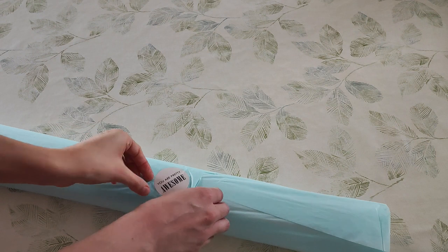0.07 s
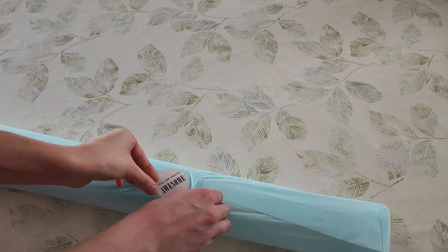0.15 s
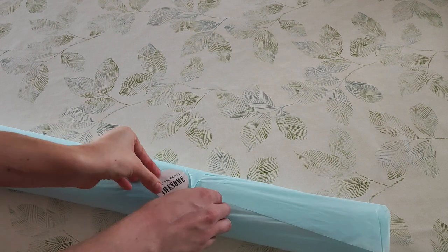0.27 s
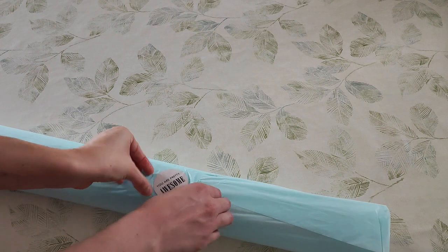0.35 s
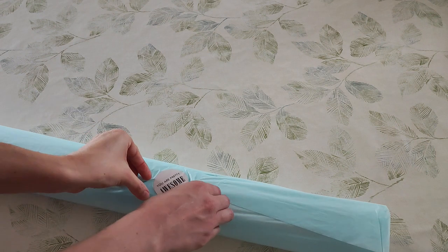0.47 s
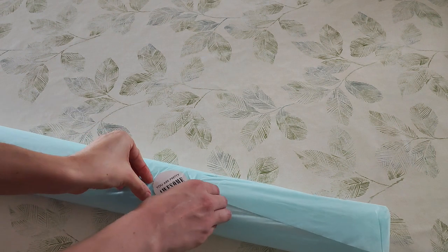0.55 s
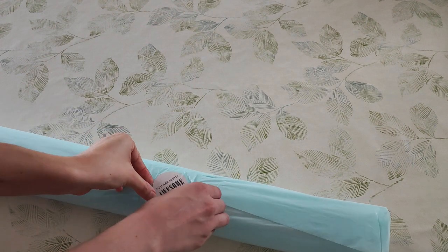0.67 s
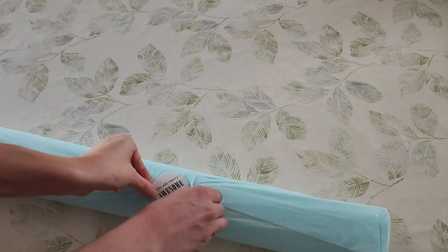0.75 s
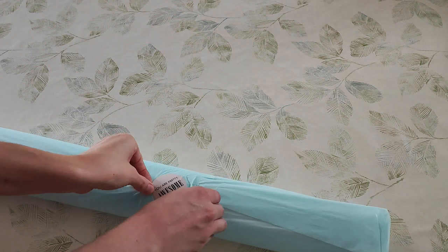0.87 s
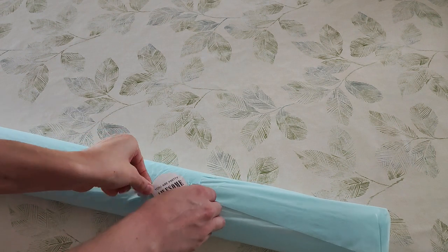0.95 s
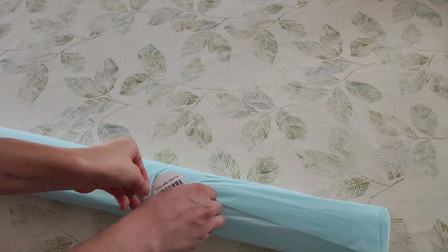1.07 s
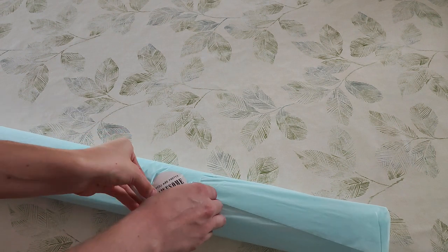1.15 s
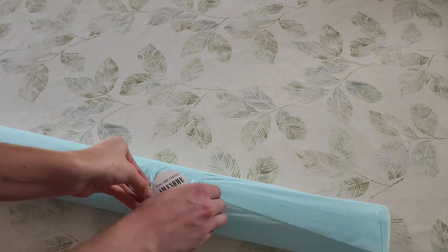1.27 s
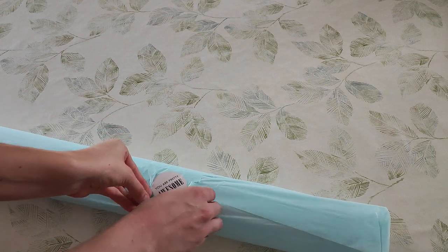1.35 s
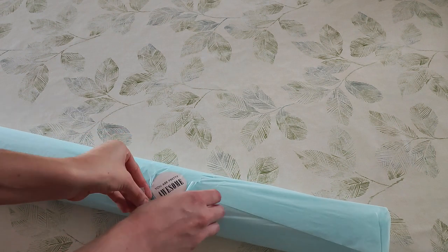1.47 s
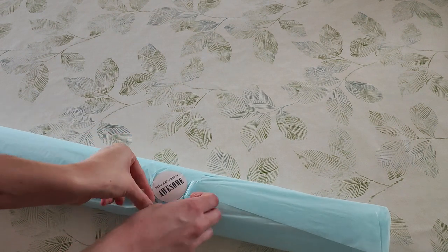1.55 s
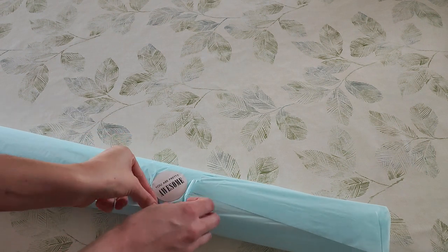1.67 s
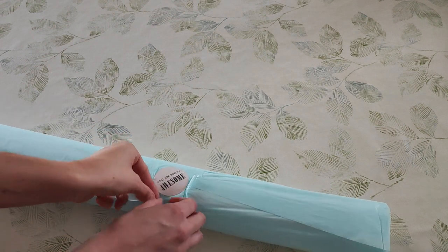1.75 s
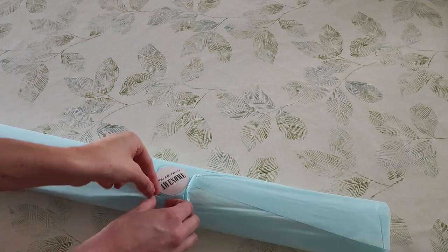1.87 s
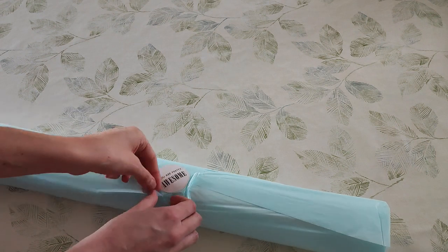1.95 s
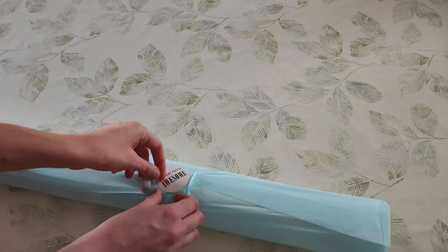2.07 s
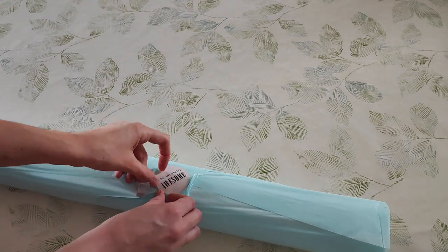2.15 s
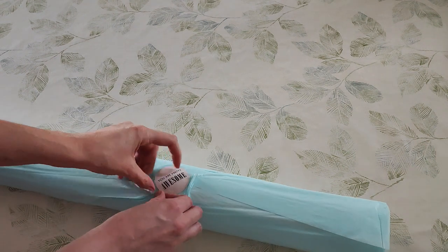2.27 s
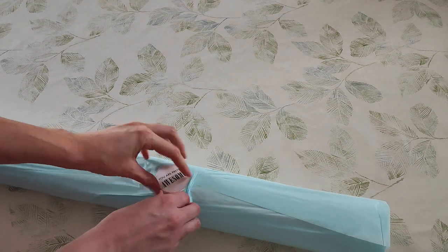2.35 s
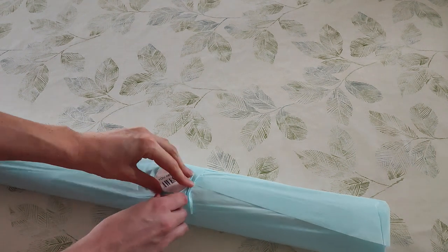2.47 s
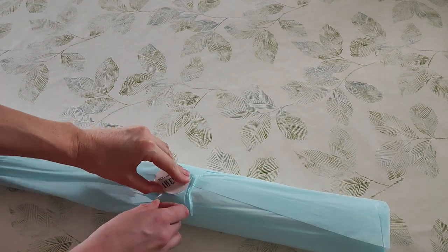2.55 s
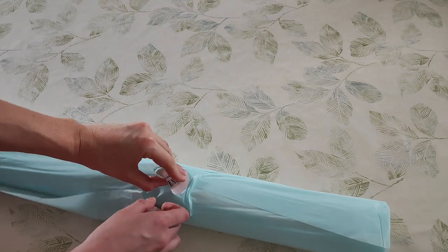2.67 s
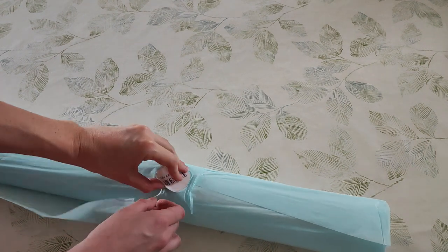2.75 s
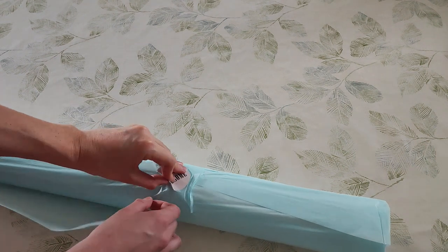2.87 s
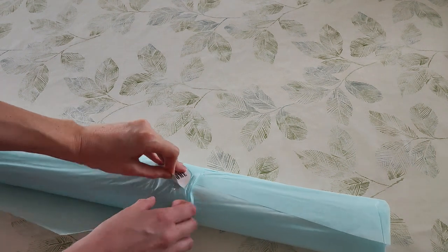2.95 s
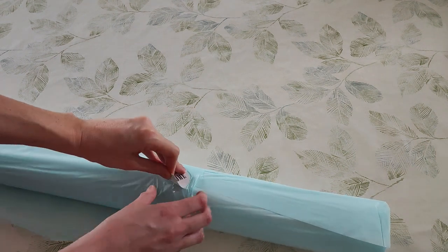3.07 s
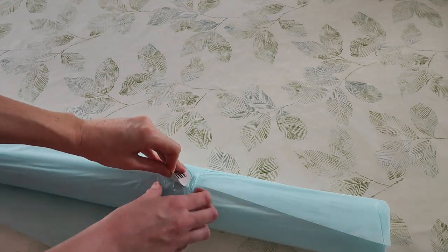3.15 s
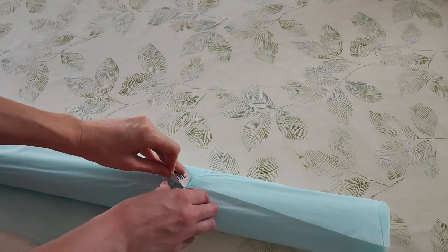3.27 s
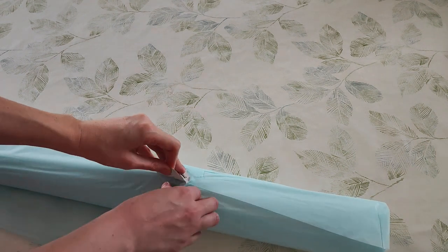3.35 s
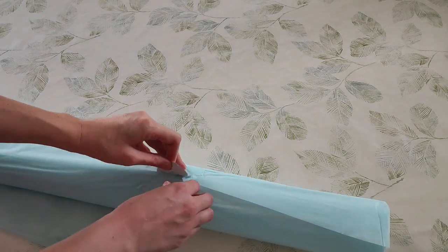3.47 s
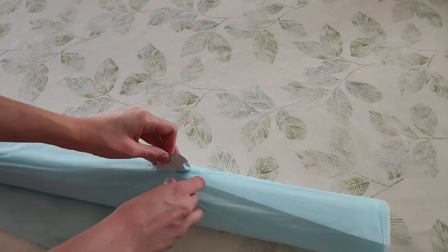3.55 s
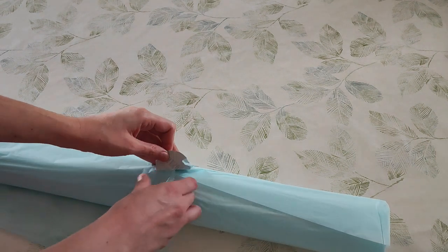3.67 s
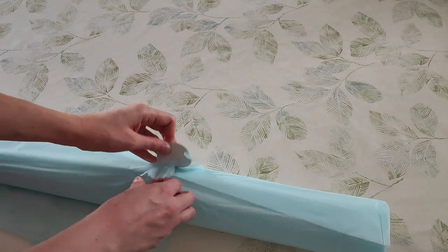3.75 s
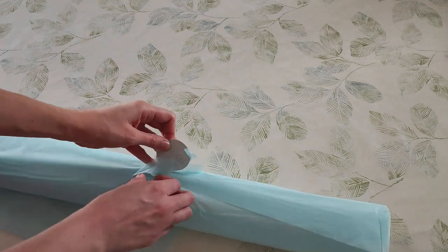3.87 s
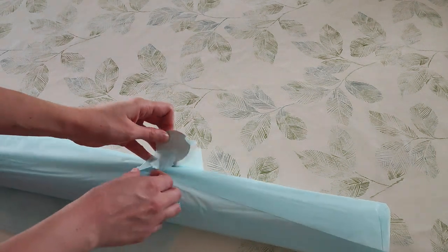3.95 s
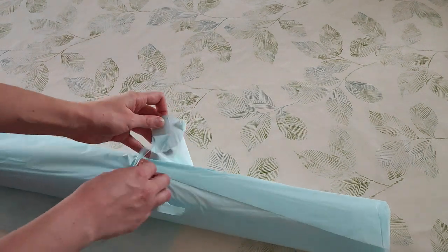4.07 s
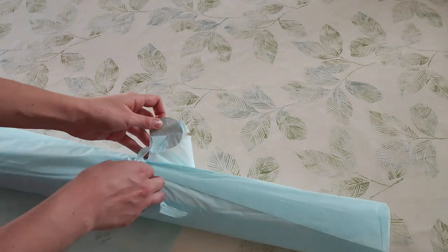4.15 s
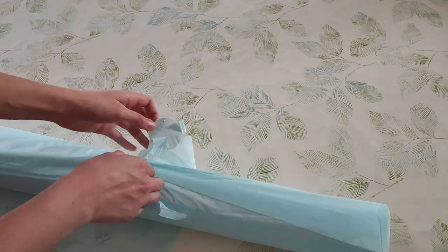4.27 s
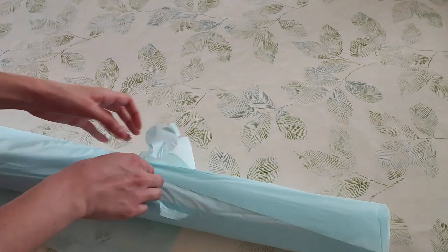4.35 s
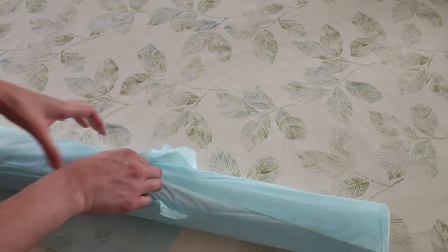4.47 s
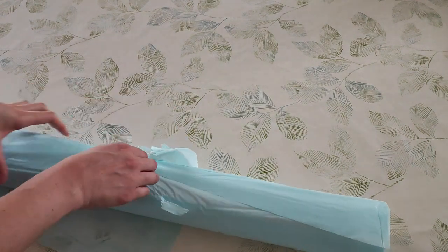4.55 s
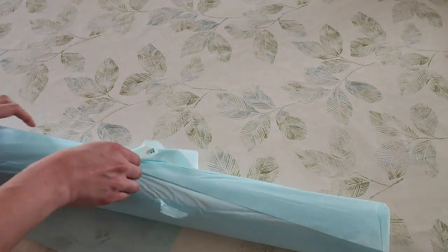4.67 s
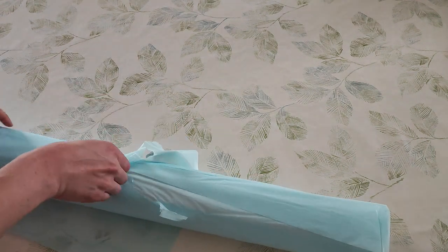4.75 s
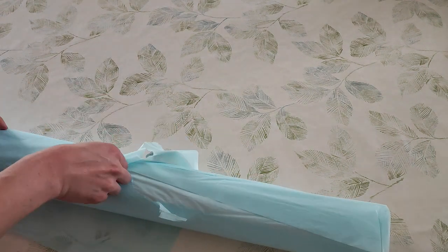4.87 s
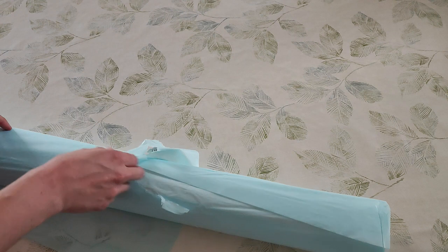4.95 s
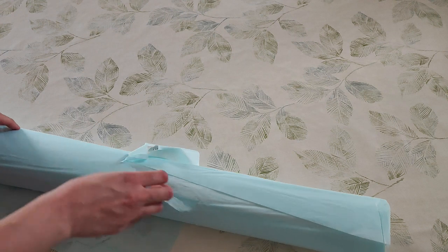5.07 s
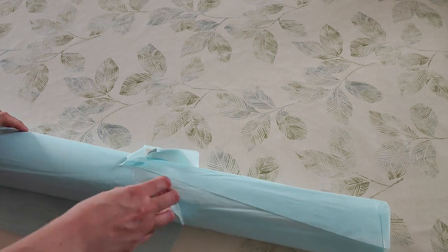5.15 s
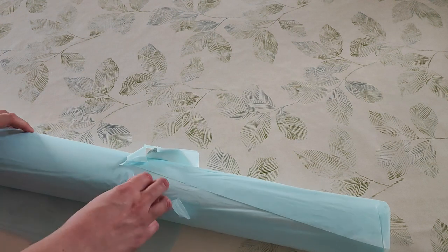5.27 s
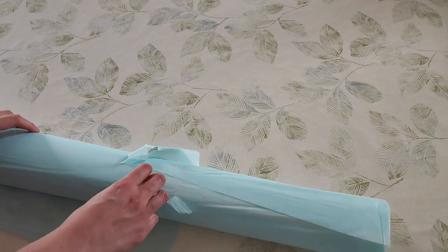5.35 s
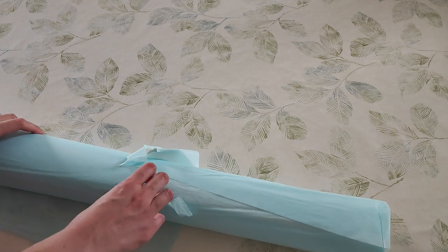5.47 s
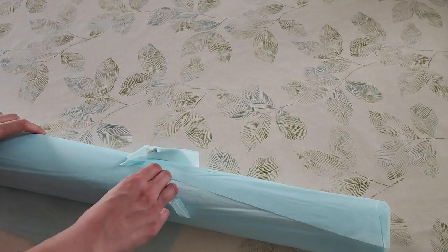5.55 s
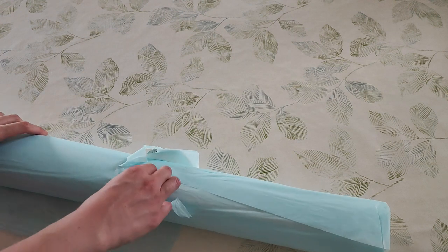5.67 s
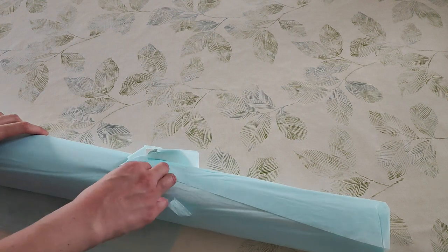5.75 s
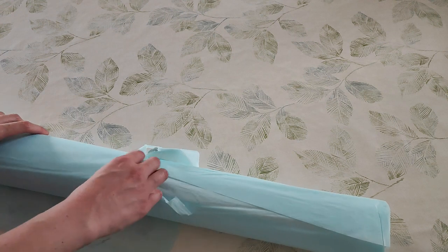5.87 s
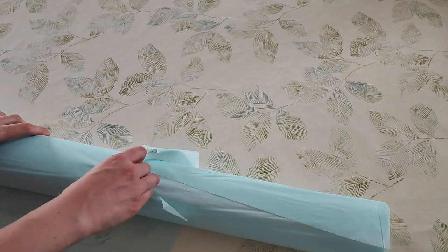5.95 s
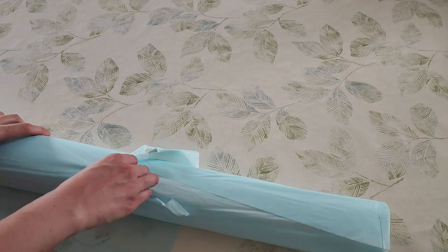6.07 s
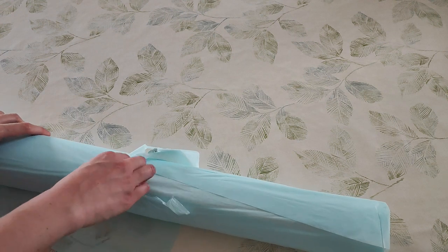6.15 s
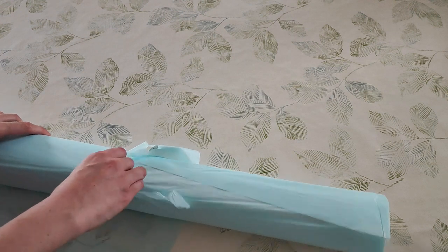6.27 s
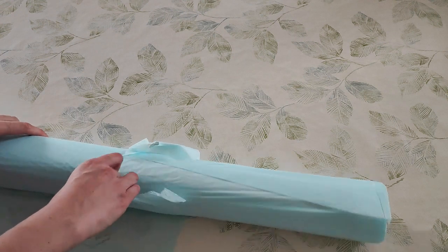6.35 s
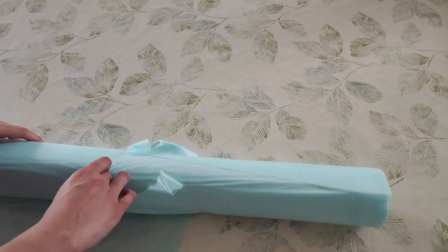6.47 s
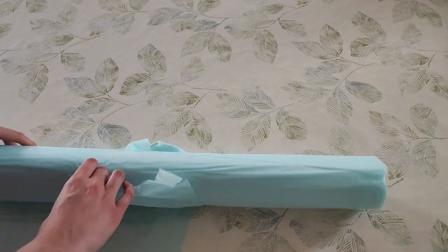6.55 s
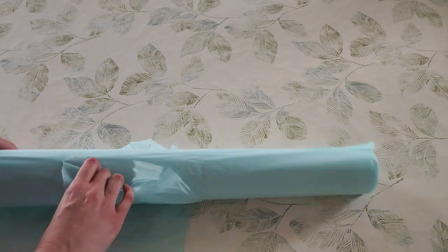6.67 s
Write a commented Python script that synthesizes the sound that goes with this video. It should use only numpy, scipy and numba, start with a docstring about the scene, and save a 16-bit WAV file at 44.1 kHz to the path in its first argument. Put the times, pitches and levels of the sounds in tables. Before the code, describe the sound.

Thin tissue paper is picked at with faint rustles and taps, then crinkles sharply in bursts before calming and being rolled, in a furnished room.

```python
"""Two hands pick a sticker off a roll of thin tissue paper on a table and unwrap it, heard in stereo.
The crinkle is thousands of short random pops, each ringing for a few cycles like a small buckle of the sheet.
Single creases snap and set off a flurry of more pops; knuckles and roll bump the table top and make it ring.
A furnished room answers with a fading noise tail, over a faint hum and hiss of shaped noise."""
import sys
import numpy as np
from scipy import signal
from scipy.fft import rfft, irfft
from scipy.io import wavfile
from scipy.ndimage import uniform_filter1d
from numba import njit

SR = 44100
rng = np.random.default_rng(int(sys.argv[2]) if len(sys.argv) > 2 else 0)


def master(y):
    """Save y as 16-bit WAV."""
    cut = np.clip(np.atleast_2d(y).T, -1, 1)
    pcm = np.round(cut * 32767)  # scale
    wavfile.write(sys.argv[1], SR, pcm.astype(np.int16))


N = 295470
T = np.arange(N) / SR

# single creases: (t/s, peak level/dB, ringing pitch f/Hz, level/dB of the flurry relative to the peak)
CREASES = [(0.029, -41, 10300, -15), (0.339, -42, 4500, -20.5), (0.38, -51.5, 4370, -7.5),
           (0.424, -54, 3920, -11), (0.443, -44, 8830, -21), (0.678, -46, 4190, -13),
           (0.7512, -43, 6500, -33), (0.7726, -36, 6000, -20), (0.887, -34.5, 4080, -25),
           (0.904, -32, 4670, -28), (0.9355, -9.5, 3960, -36), (0.952, -31, 4500, -18),
           (1.006, -32, 4500, -16), (1.036, -30, 4200, -16), (1.048, -35, 3500, -18.5),
           (1.056, -33, 4500, -21), (1.066, -36, 4000, -23), (1.075, -35, 3340, -29),
           (1.087, -33, 3200, -20), (1.096, -27.5, 2660, -27), (1.2087, -46, 6230, -20),
           (1.276, -55, 3960, -28), (1.2885, -42, 4600, -22), (1.2975, -30, 6850, -27),
           (1.303, -38, 9500, -22), (1.306, -31, 9500, -17), (1.31, -30, 4600, -19),
           (1.3145, -30, 9500, -25), (1.345, -40, 5030, -14), (1.4275, -43, 4550, -24),
           (1.4891, -41, 10100, -22), (1.436, -40, 4500, -30), (1.502, -35, 9050, -22),
           (1.5417, -34, 4000, -20), (1.5514, -34, 9100, -15), (1.6312, -38.5, 6500, -11),
           (1.6733, -39, 4730, -16), (1.7015, -42, 4680, -27), (1.775, -27, 6200, -24),
           (1.777, -30, 5770, -19.5), (1.781, -27.5, 8500, -23), (1.796, -41, 3500, -14),
           (1.811, -38, 11000, -25), (1.842, -38, 4050, -20), (1.852, -28.5, 8900, -20),
           (1.8639, -29, 4770, -20.5), (1.89, -29.5, 10800, -25), (1.906, -44, 7000, -27),
           (1.943, -43, 6890, -20), (1.9539, -37, 4960, -15), (1.958, -47, 3500, -28),
           (1.978, -34, 4710, -27), (2.028, -42, 4000, -25), (2.038, -36.5, 4840, -12.5),
           (2.0512, -30, 9700, -20), (2.06, -32, 8000, -18), (2.0667, -34, 5140, -17),
           (2.149, -28, 6740, -19), (2.199, -26, 9020, -15), (2.206, -21.5, 5360, -21),
           (2.246, -47, 7500, -26), (2.3178, -32, 4870, -24), (2.325, -32, 6000, -17),
           (2.373, -40, 5870, -30), (2.4034, -31, 8450, -17.5), (2.441, -39, 3970, -23),
           (2.4563, -21, 5200, -25), (2.4724, -34, 8870, -19), (2.5545, -40, 4860, -22),
           (2.591, -26.5, 5040, -23), (2.592, -32.5, 12000, -14), (2.597, -32.5, 6000, -12),
           (2.6603, -38, 2670, -30), (2.698, -43, 9850, -22), (2.709, -35.5, 6040, -15),
           (2.8317, -33.5, 6050, -34), (2.911, -35, 6030, -22), (2.9413, -29, 8950, -23),
           (2.9498, -14, 6360, -29), (3.002, -23, 6850, -31), (3.021, -31, 6200, -22.5),
           (3.057, -50, 390, -14), (3.0636, -35, 4900, -20), (3.097, -33, 6200, -32),
           (3.1222, -32, 6630, -31), (3.192, -42, 4900, -9.5), (3.2816, -34, 8580, -21),
           (3.29, -25, 5250, -23), (3.315, -20.5, 6130, -15.5), (3.343, -27.5, 4680, -12),
           (3.363, -26, 7000, -20), (3.453, -41, 3500, -28), (3.464, -37, 4000, -26),
           (3.478, -34, 5100, -23), (3.4861, -34, 3790, -26), (3.508, -36, 5000, -17),
           (3.517, -27.5, 5070, -23), (3.535, -27, 5300, -15.5), (3.5862, -29.5, 4960, -16),
           (3.6162, -26.5, 5120, -24.5), (3.656, -40, 9140, -25), (3.67, -31, 6040, -30),
           (3.694, -45, 4500, -22), (3.7191, -34, 6440, -16), (3.7438, -21, 4700, -22),
           (3.764, -18, 5140, -16), (3.8147, -20, 6140, -28), (3.907, -41, 3920, -7),
           (3.942, -24, 5650, -19), (3.959, -42, 990, -12), (4.055, -40, 790, -22),
           (4.065, -31.5, 3300, -14.5), (4.074, -43, 1000, -25), (4.086, -34.5, 1520, -10),
           (4.164, -46, 920, -12), (4.1664, -29.5, 6800, -21), (4.206, -34.5, 1460, -20),
           (4.207, -28, 4000, -26), (4.211, -43, 940, -21), (4.2344, -32, 3340, -22),
           (4.3727, -32, 5600, -15), (4.3931, -32, 4630, -13), (4.397, -32, 8730, -13),
           (4.4248, -28, 5200, -18), (4.586, -43, 5500, -19), (4.66, -44, 3950, -16),
           (4.908, -52, 1950, -14), (5.077, -56, 1470, -17), (5.09, -59, 1250, -7), (5.107, -58, 1030, -8),
           (5.126, -58, 1200, -8), (5.132, -46, 4700, -12), (5.227, -63, 744, -13),
           (5.2885, -46, 9530, -17), (5.46, -59, 1030, -8), (5.522, -60, 735, -11),
           (5.64, -56.5, 2800, -10.5), (5.665, -45, 9600, -14), (5.7478, -40, 9100, -22),
           (5.9449, -45, 13000, -25), (5.962, -38.5, 8500, -10), (6.114, -48.5, 4740, -5.5),
           (6.249, -35, 8700, -8), (6.251, -57, 460, -12), (6.282, -43, 1080, -5), (6.301, -52, 470, -4),
           (6.326, -47, 934, -10), (6.327, -35, 1630, -9), (6.328, -28, 6000, -11), (6.338, -25, 7000, -14),
           (6.338, -36, 1000, -2), (6.349, -25.5, 6500, -11.5), (6.31, -46, 460, -11),
           (6.322, -49.5, 450, -4), (6.355, -33, 740, -8), (6.358, -28, 7000, -15), (6.366, -27, 5500, -14),
           (6.378, -33.5, 2500, -20), (6.368, -45, 790, -18), (6.381, -32.5, 910, -19),
           (6.4, -39, 577, -17), (6.419, -28.5, 2620, -16), (6.438, -40, 690, -18),
           (6.465, -33.5, 2470, -10), (6.5555, -40, 5070, -27), (6.583, -35, 5700, -26),
           (6.651, -27, 4400, -25)]
# fingers resting and shifting on the sheet: (t/s, crinkle level/dB, left minus right level/dB)
RESTING_GRIP = [(0, -68.5, 0), (.2, -69, 1), (.5, -65.5, 2), (.75, -59, 1.5), (1.25, -62.5, 1),
                (1.75, -57, 2), (2.0, -55.5, 1.5), (2.2, -49.5, 2.5), (2.55, -50.5, 3.5), (2.75, -63, 2.5),
                (2.92, -62, 2), (3.1, -61.5, -0.5), (3.7, -56, 1), (4.15, -53, -1), (4.33, -69, 1.5),
                (4.6, -60, -0.5), (4.85, -65, 0.5), (5.3, -69, 1), (5.85, -66, 0.5), (6.15, -57.5, 0.5),
                (6.7, -49, 0)]


def undb(db):
    """Turn decibels into an amplitude factor."""
    return 10 ** (np.asarray(db) / 20)


def filtered(x, order, hz, kind="low"):
    """Keep the sound below (low) or above (high) a pitch."""
    return signal.lfilter(*signal.butter(order, hz, kind, fs=SR), x)


def ring(x, hz, width_hz):
    """Two-pole resonance with gain 1 at the centre."""
    return signal.lfilter(*signal.iirpeak(hz, hz / width_hz, fs=SR), x)


def walk(rate):
    """Random level that glides to a new value about `rate` times a second; its spread is about 0.8."""
    k = int(SR / rate)
    steps = np.repeat(rng.standard_normal(N // k + 1), k)
    return 0.95 * uniform_filter1d(steps, k)[:N]


def hum():
    """Low house rumble and microphone hiss: shaped noise, more alike left and right in the bass."""
    # loudness at each pitch: (f/Hz, relative level/dB per Hz)
    hum_levels = [(15, -10), (25, 2), (33, -2), (62, 2.5), (80, -3.5), (130, -2.5), (300, -10), (600, -14),
                  (1200, -20), (2500, -22.5), (5000, -40), (11000, -23), (16000, -18)]
    # how alike left and right are: (f/Hz, correlation from 0 to 1)
    hum_likeness = [(30, 0.56), (250, 0.62), (1000, 0.066), (4000, 0.075), (16000, .05)]
    level_db = -62
    log_hz = np.log(np.fft.rfftfreq(N, 1 / SR) + 1)
    hz, db = np.transpose(hum_levels)
    gain = undb(np.interp(log_hz, np.log(hz), db))
    hz, likeness = np.transpose(hum_likeness)
    alike = np.interp(log_hz, np.log(hz), likeness)
    # the shared part has equal signs left and right, the differing part opposite signs
    mid, side = rfft(rng.standard_normal((2, N))) * gain * np.sqrt([1 + alike, 1 - alike])
    out = irfft(np.array([mid + side, mid - side]), N)
    return undb(level_db + 1.1 * walk(6)) * out / out.std()


def room(dry):
    """A diffuse tail, duller than the direct sound and, in the treble, unlike at the two ports."""
    t60_s, level_db = 0.51, -9.5
    alike_below_hz, dull_above_hz = 322, 6550
    age = T[:int(.5 * SR)]
    fade_in = np.clip(age / 0.0036 - .5, 0, 1)  # silent for 1.8 ms, full at 5.4 ms
    tail = rng.standard_normal((2, len(age))) * undb(-60 * age / t60_s) * fade_in
    # long waves reach both close ports alike
    bass = filtered(tail, 1, alike_below_hz)
    tail = tail - bass + bass[0]
    tail = filtered(tail, 1, dull_above_hz)
    tail /= np.sqrt((tail ** 2).sum(axis=1, keepdims=True))
    both_ports = dry.mean(axis=0)[None]
    return undb(level_db) * signal.fftconvolve(tail, both_ports, axes=1)[:, :N]


def bumps():
    """Half-sine pushes ring the table top; a longer contact is duller, the ring time varies between bumps."""
    # bumps: (t/s, peak level/dB, contact/ms, ring time as a factor on the table's usual ring,
    # favoured pitch of the spot f/Hz, left minus right level/dB)
    knocks = [(0.369, -49, 1.5, 0.49, 180, 1), (0.474, -34.5, 0.46, 0.32, 240, 8),
              (0.4855, -40, 0.31, 0.35, 680, 4), (0.502, -41.5, 2.1, 1.4, 195, 9),
              (0.5119, -39, 1.4, 0.94, 195, 5), (0.545, -49, 0.4, 0.6, 690, 1),
              (0.635, -52, 0.4, 1, 720, 1), (0.933, -36, 0.18, 0.5, 186, 2),
              (1.138, -40, 0.82, 0.35, 186, 1), (2.452, -42, 0.39, 0.32, 474, 1),
              (2.714, -50, 0.64, 0.42, 153, 1), (2.95, -47.5, 1, 0.41, 266, 1.5),
              (3.034, -47.5, 0.66, 0.76, 334, -2), (3.165, -47, 0.92, 0.73, 315, -1),
              (3.286, -43.5, 0.41, 0.39, 353, 4), (3.311, -41, 0.8, 0.66, 312, 1),
              (3.484, -41.5, 0.38, 0.35, 471, 2), (3.621, -48, 0.46, 0.36, 326, 2),
              (3.746, -42, 1.1, 0.36, 520, 4), (3.913, -45.5, 0.39, 1.2, 468, 3),
              (4.199, -59, 0.53, 0.58, 380, 3), (4.39, -42.5, 0.9, 0.97, 598, 2),
              (5.227, -51, 0.84, 0.89, 191, 0), (5.454, -51, 0.49, 0.55, 342, -2),
              (5.987, -45.5, 0.53, 1.7, 186, 1)]
    # usual ringing of the table top: (f/Hz, level/dB, time to fade by 60 dB t/s)
    top_rings = [(165, -18, .08), (190, -1, .4), (206, -1, .14), (228, 0, .13), (310, -15, .2),
                 (388, -9, .35), (452, -7, .35), (653, 0, .22), (708, -3, .25), (791, -3, .3),
                 (888, -5, .25), (953, -7, .3), (1195, -12, .13)]
    spot_db_per_octave, delay_s = 3, .0025
    out, age = np.zeros((2, N + SR)), T[:SR // 2]
    for s, db, contact_ms, ring_factor, spot_hz, pan_db in knocks:
        top = np.zeros(len(age))
        for hz, ring_db, t60 in top_rings:
            # pitches far from the favoured one ring more weakly at this spot
            spot_db = -spot_db_per_octave * abs(np.log2(hz / spot_hz))
            fade_db = -60 * age / t60 / max(ring_factor, .1)
            top += undb(ring_db + spot_db + fade_db) * np.sin(2 * np.pi * hz * age)
        # no contact is shorter than 0.2 ms
        push = np.sin(np.pi * np.clip(1000 * T[:1024] / max(contact_ms, .2), 0, 1))
        thud = signal.fftconvolve(top, push)
        thud /= np.abs(thud).max()
        at = int((s + delay_s) * SR)
        port_db = db + np.array([[pan_db], [-pan_db]]) / 2
        out[:, at:at + len(thud)] += undb(port_db) * thud
    # the top is too small to radiate the deepest bass
    return filtered(out[:, :N], 2, 130, "high")


def snaps():
    """Each crease flips over: a few cycles at its pitch, a bright crack, then the echo off the table."""
    deep_hz, damping = 2500, 1.6  # below this pitch creases ring for more cycles and crack less
    crack_share, crack_s = .75, .0004
    echo_s, echo_db = .0042, -16
    left_lag_s = .000018  # creases reach the left port this much later
    out, age = np.zeros(N), T[:512]
    for s, db, hz, _ in CREASES:
        crisp = np.sqrt(min(hz / deep_hz, 1))
        shape = np.sin(2 * np.pi * hz * age) * hz * age * np.exp(-damping * crisp * hz * age)
        crack = rng.standard_normal(len(age)) * np.exp(-age / crack_s)
        shape += crack_share * crisp ** 3 * crack * np.abs(shape).max()
        at = int((s + .0004) * SR)
        out[at:at + len(age)] += undb(db) * shape / np.abs(shape).max()
    out = out + undb(echo_db) * np.roll(out, int(echo_s * SR))
    # turning the phase in step with pitch delays by less than one sample
    delay = np.exp(-2j * np.pi * np.fft.rfftfreq(N, 1 / SR) * left_lag_s)
    left = irfft(rfft(out) * delay, N)
    return np.array([left, out])


def flurry(size_hz):
    """Power of the after-crackle that each crease sets off, mostly in buckles near its own size."""
    t60_s, rise_s, spread_octaves = 0.069, .001, .8
    power = np.zeros(N)
    for s, db, hz, after_db in CREASES:
        at = int(s * SR)
        age = T[:int(t60_s * SR)][:N - at]
        near = np.exp(-(np.log2(size_hz / hz) / spread_octaves) ** 2)
        fade = undb(db + after_db - 60 * age / t60_s) ** 2
        power[at:at + len(age)] += near * np.minimum(age / rise_s, 1) * fade
    return power


def handling():
    """Strength of the broad, small, middle and finest buckles: the resting grip plus every pull."""
    # pulls and crumples: (start t/s, rise t/s, hold t/s, crinkle level/dB,
    # then level/dB relative to it of broad folds, small folds, finest buckles)
    pulls = [(0.463, 0.02, 0.044, -79, 22.5, 16.5, -14), (0.539, 0.017, 0.041, -60.5, -8, -3.5, -3),
             (0.757, 0.017, 0.03, -52.5, -14, -11, -4.5), (0.857, 0.032, 0.026, -51, -10.5, -10, -3),
             (0.925, 0.012, 0.048, -42, -14, -5.5, -5), (0.981, .02, 0.067, -44, -15.5, -6, -2),
             (1.06, 0.024, 0.027, -46.5, -10, -7.5, 2), (1.183, 0.03, 0.045, -56, -13, -14, -7),
             (1.292, 0.008, 0.042, -58.5, -11, 0, 6.5), (1.483, 0.041, 0.052, -54.5, -18, -14, 1),
             (2.09, 0.046, 0.069, -47.5, -24, -11, -3), (2.295, 0.035, 0.05, -50, -13, -6, -3),
             (2.421, 0.018, 0.058, -45, -19, -8, 0), (2.694, 0.013, 0.0082, -60, -2, -8, 9.5),
             (2.794, 0.036, 0.019, -57.5, -25, -12, 4), (2.943, 0.011, 0.036, -43.5, -13, -12, 1.5),
             (3.023, 0.033, 0.011, -53.5, -9, -6.5, 6), (3.158, 0.036, 0.013, -50, -5.5, -12, 4),
             (3.288, 0.024, 0.04, -41, -10, -7, 3), (3.437, 0.052, 0.062, -47, -17, -10, -1),
             (3.596, 0.019, 0.019, -54, -9, -13, 5), (3.736, 0.025, 0.054, -30.5, -20, -14.5, -7.5),
             (3.888, 0.025, 0.077, -44, -13, -8, 3), (3.972, 0.035, 0.07, -40, -17, -6.5, -1.5),
             (4.16, 0.0092, 0.0084, -53, -12, 2, 2), (4.192, 0.019, 0.0086, -52.5, 2, 3, 6.5),
             (4.351, 0.028, 0.075, -50, -11.5, -3, 0), (4.438, 0.027, 0.072, -50.5, -15, -7, -4.5),
             (4.574, 0.015, 0.06, -53, -15, -9, -3), (4.715, 0.019, 0.012, -58.5, -14, -12, -7),
             (4.839, 0.049, 0.037, -60, -11, -5.5, 1.5), (4.998, 0.074, 0.096, -60.5, -7, -12, 0.5),
             (5.182, 0.019, 0.032, -64, 0, -5, 3), (5.362, 0.035, 0.027, -80, -5, -4, 20.5),
             (5.503, 0.036, 0.038, -78.5, 10, 10, 20), (5.909, 0.083, 0.0049, -45.5, -12, -5, 4),
             (6.157, 0.1, 0.044, -43.5, -23, -7.5, -2.5), (6.269, 0.067, 0.022, -38.5, -14.5, -7, 3),
             (6.352, 0.027, 0.0085, -36.5, -12.5, 2, -1), (6.384, 0.029, 0.023, -39.5, -13, -9.5, -3),
             (6.572, 0.11, .05, -40.5, -27, -3.5, -2)]
    rise_db = 22.5  # each pull starts this far below its full level
    release_t60_s, release_per_rise = 0.076, 2.7  # a slower pull also lets go more slowly

    def size_power(broad_db, small_db, fine_db):
        """Power of the four size groups relative to the middle one."""
        return undb([[broad_db], [small_db], [0], [fine_db]]) ** 2

    s, db, _ = np.transpose(RESTING_GRIP)
    power = size_power(-11.5, -8.5, -5) * undb(np.interp(T, s, db)) ** 2
    for start, rise, hold, db, *sizes_db in pulls:
        t60 = release_t60_s + release_per_rise * rise
        let_go, end = rise + hold, rise + hold + t60
        at = int(start * SR)
        age = T[:int(end * SR)][:N - at]
        shape_db = np.interp(age, [0, rise, let_go, end], [-rise_db, 0, 0, -60])
        power[:, at:at + len(age)] += size_power(*sizes_db) * undb(db + shape_db) ** 2
    return np.sqrt(power)


def clicks(s, size, pan_db, lag_s):
    """Impulses at both ports, each split between two samples; a positive lag reaches the right port later."""
    out = np.zeros((2, N + 2))
    for port, side in enumerate((1, -1)):
        at = np.clip((s - side * lag_s / 2) * SR, 0, N - 1)
        whole = at.astype(int)
        gain = size * undb(side * pan_db / 2)
        np.add.at(out[port], whole, gain * (1 - at + whole))
        np.add.at(out[port], whole + 1, gain * (at - whole))
    return out[:, :N]


@njit
def drifting_ring(x, g, k):
    """State-variable band-pass whose centre moves every sample; gain 1 at the centre."""
    y = np.empty_like(x)
    for port in range(x.shape[0]):
        b, l = 0., 0.
        for i in range(x.shape[1]):
            v = (b + g[i] * (x[port, i] - l)) / (1 + g[i] * (g[i] + k))
            b, l = 2 * v - b, l + 2 * g[i] * v
            y[port, i] = k * v
    return y


def buckles(sizes, hand, cluster_db, after_power):
    """Scattered pops of the sheet, each size ringing briefly and wandering in pitch and strength on its own."""
    size_scatter_db, biggest = 3.3, 3.4  # pop sizes are random, with a ceiling
    pan_scatter_db, wander_db = 4, 3.0
    lag_s, lag_scatter_s, lag_scatter_cycles = .000005, .0001, .18  # arrival between the ports
    drift_octaves, drift_per_s = .13, 22  # the folds keep changing size
    drift_top_hz = 3500  # finer buckles drift less
    out, total = 0, np.sqrt(sum(undb(db) ** 2 for _, _, db, _ in sizes))
    for hz, cycles, db, per_s in sizes:
        count = int(per_s * N / SR)
        when_s = rng.random(count) * N / SR
        sign, pan, lag = rng.standard_normal((3, count))
        big = np.minimum(rng.exponential(size=count), biggest)
        size = np.sign(sign) * undb(size_scatter_db * big)
        lags_s = lag_s + min(lag_scatter_cycles / hz, lag_scatter_s) * lag
        pops = clicks(when_s, size, pan_scatter_db * pan, lags_s)
        drift = drift_octaves * min(drift_top_hz / hz, 1) * walk(drift_per_s)
        centre = np.tan(np.pi * np.minimum(hz * 2 ** drift / SR, .42))
        # two rings in a row; the tiny offset keeps the filter from computing with vanishing numbers
        pops = drifting_ring(pops + 1e-18, centre, 1.44 / cycles)
        pops = drifting_ring(pops, centre, 1.44 / cycles)
        strength = np.sqrt((hand * undb(db) / total) ** 2 + after_power(hz))
        out = out + strength * undb(cluster_db + wander_db * walk(20)) * pops / pops.std()
    return out


def crinkle():
    """The hands set the strength; one buckle triggers its neighbours, so all sizes swell and thin together."""
    # buckle sizes, from broad to fine: (f/Hz, cycles of ringing, relative level/dB, buckles per second)
    broad = [(295, 1.1, 0.5, 500), (475, 2.9, 0.5, 790)]
    small = [(760, 2.27, -7, 530), (1053, 3.3, -6, 610), (1502, 2.7, -2.5, 910), (2084, 2.5, 0, 1200)]
    middle = [(3050, 1.75, -11, 1200), (4310, 2.26, -8, 1800), (6200, 2.1, -3.5, 2100),
              (7610, 4.3, -5, 1800)]
    fine = [(8350, 3.3, 0.62, 1700), (12500, 1.34, 0, 1300), (14100, 2.2, 0.93, 1700)]
    # lone fibres letting go, under one cycle each, same columns
    fibre_ticks = [(5170, 0.55, 0, 160), (11500, 0.9, 0, 90)]
    tick_db = -7.5  # against the middle buckles
    hands = handling()
    cluster_db = 1.9 * (walk(25.082) + 0.3 * walk(150))
    sheet = snaps()
    for sizes, hand in zip((broad, small, middle, fine), hands):
        sheet += buckles(sizes, hand, cluster_db, flurry)
    # ticks join no flurry
    sheet += buckles(fibre_ticks, hands[2] * undb(tick_db), cluster_db, lambda hz: 0)
    s, _, left_minus_right_db = np.transpose(RESTING_GRIP)
    pan_db = np.interp(T, s, left_minus_right_db)
    return sheet * undb(np.array([pan_db, -pan_db]) / 2)


def scene():
    """Paper and table heard directly, their answer from the room, and the hum and hiss."""
    sheet, table = crinkle(), bumps()
    # the room answers only the part of the knocks above 500 Hz; their low ring stays dry
    to_room = sheet + filtered(table, 2, 500, "high")
    return sheet + table + room(to_room) + hum()


def record(dry):
    """The left port has its own resonances, the housing dips one treble band, the top is cut."""
    # left port against the right: (f/Hz, level/dB, phase ahead/radians)
    left_port = [(1500, 0, .1), (4700, 3, .4), (7000, -2.5, 1.0), (9300, 3.5, 1.3), (11000, 1.5, 1.6),
                 (12500, -2.5, 2.7), (16000, -2, 3.0)]
    notch_hz, notch_width_hz, notch_depth = 7780, 1600, 0.55
    top_hz = 15700
    port_hz, port_db, ahead = np.transpose(left_port)
    hz = np.fft.rfftfreq(N, 1 / SR)
    response = undb(np.interp(hz, port_hz, port_db)) * np.exp(1j * np.interp(hz, port_hz, ahead))
    left = irfft(rfft(dry[0]) * response, N)
    heard = np.array([left, dry[1]])
    heard = heard - notch_depth * ring(heard, notch_hz, notch_width_hz)
    return signal.sosfilt(signal.ellip(10, .2, 80, top_hz, fs=SR, output="sos"), heard)


dry = scene()
out = record(dry)
master(out)
```